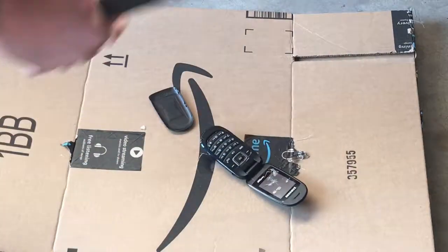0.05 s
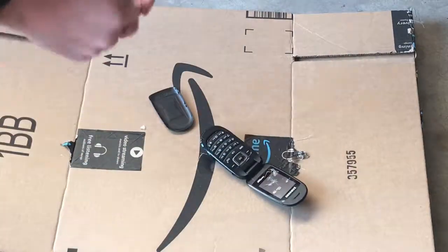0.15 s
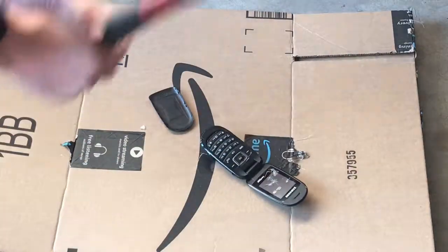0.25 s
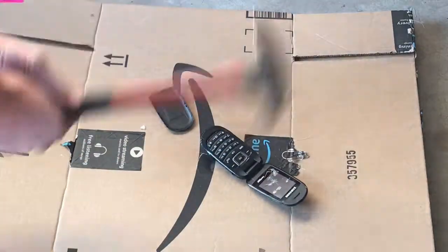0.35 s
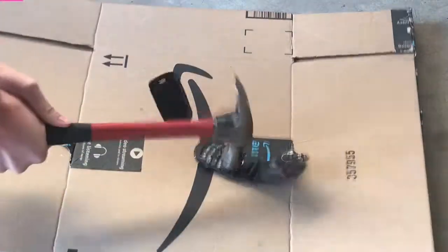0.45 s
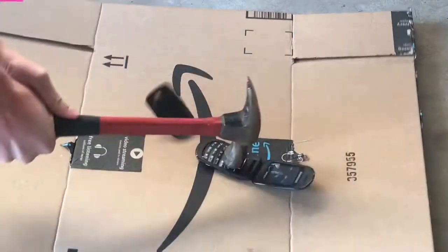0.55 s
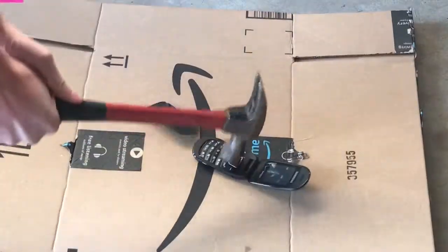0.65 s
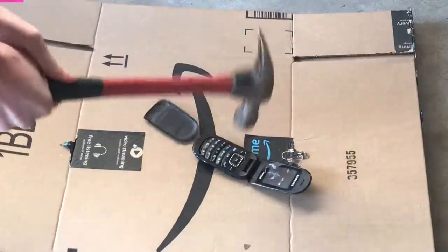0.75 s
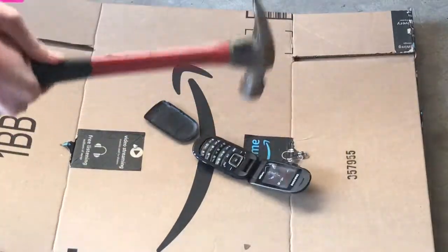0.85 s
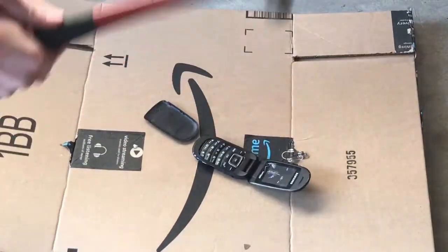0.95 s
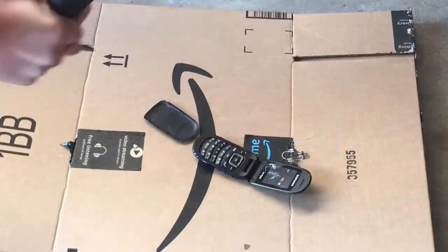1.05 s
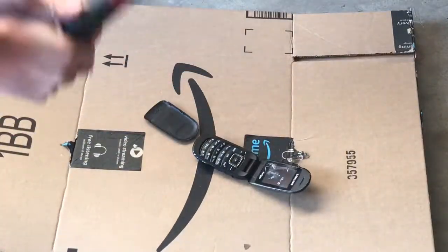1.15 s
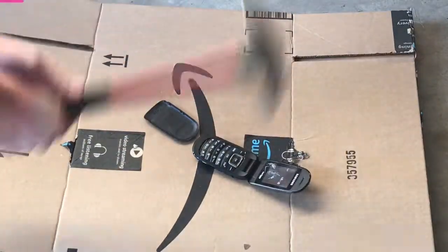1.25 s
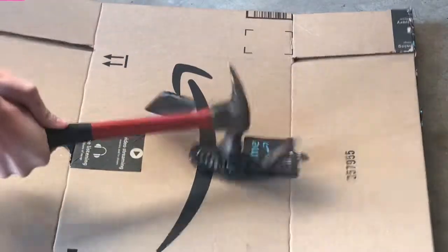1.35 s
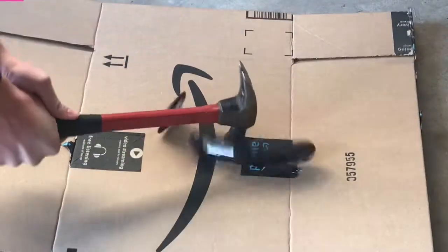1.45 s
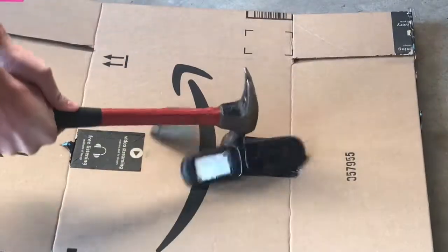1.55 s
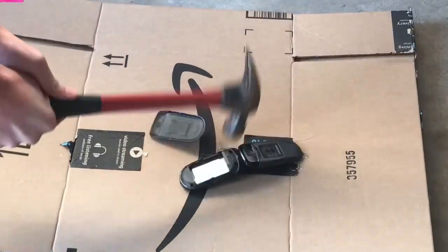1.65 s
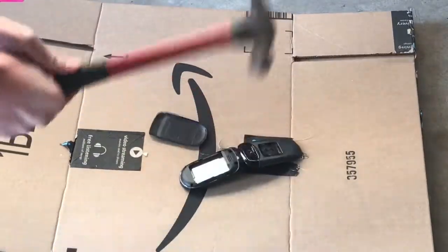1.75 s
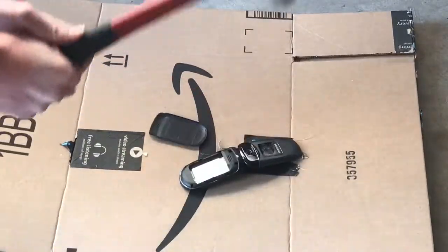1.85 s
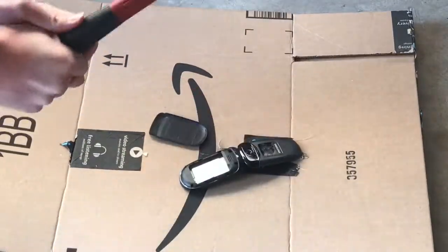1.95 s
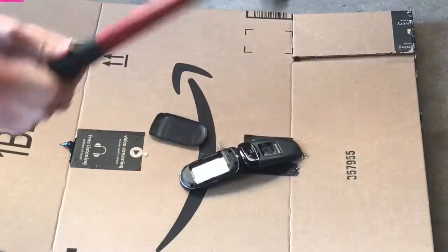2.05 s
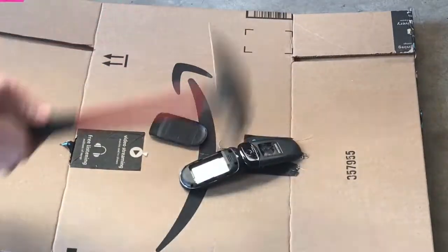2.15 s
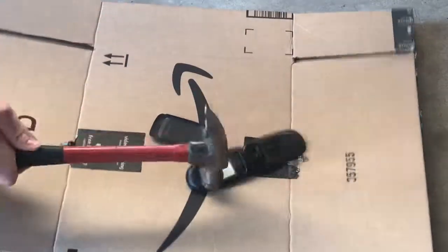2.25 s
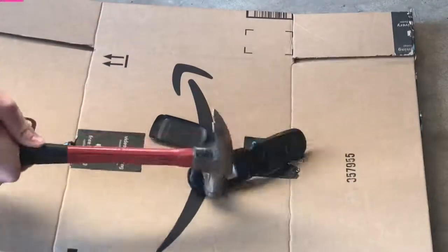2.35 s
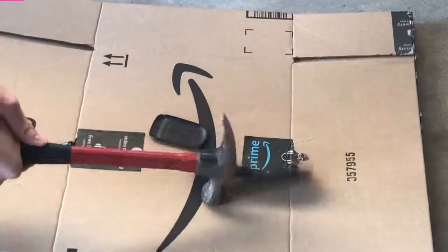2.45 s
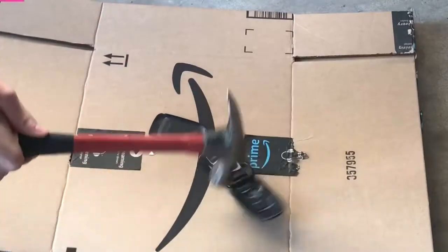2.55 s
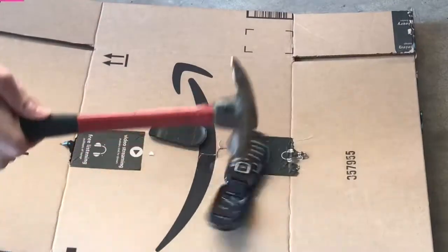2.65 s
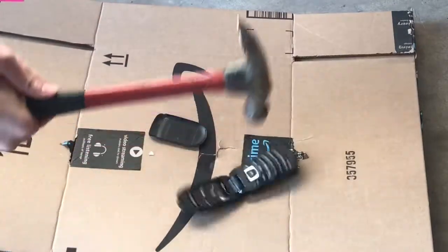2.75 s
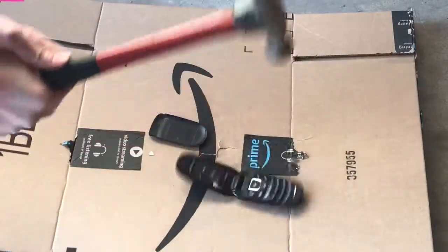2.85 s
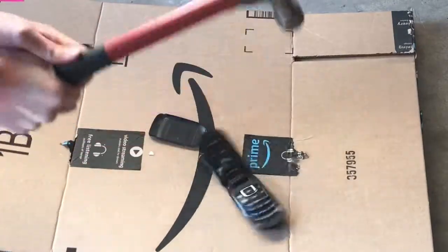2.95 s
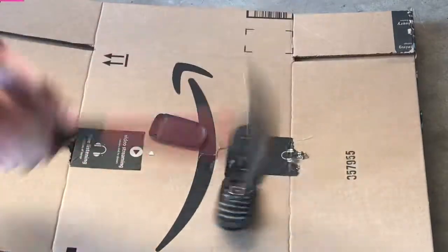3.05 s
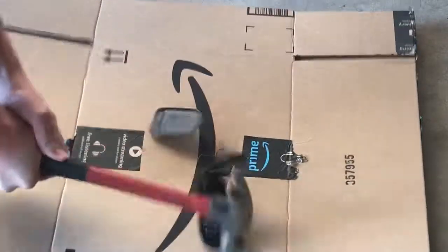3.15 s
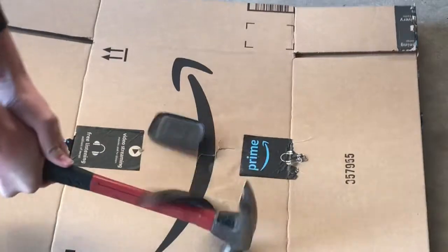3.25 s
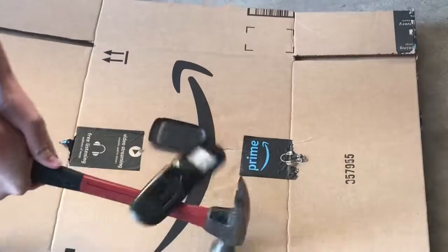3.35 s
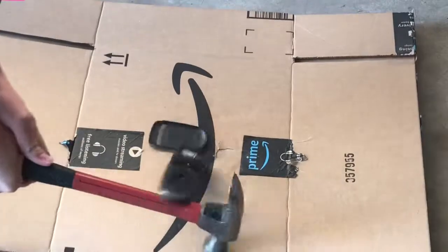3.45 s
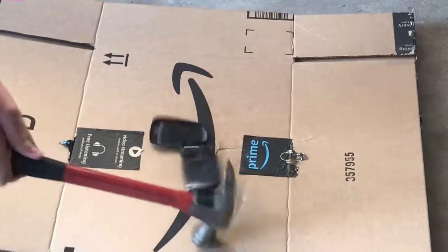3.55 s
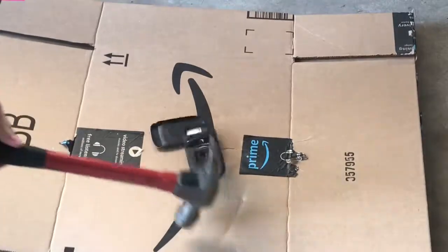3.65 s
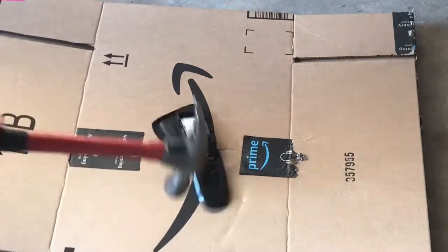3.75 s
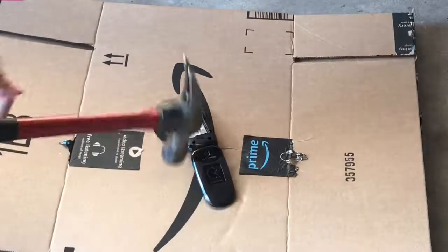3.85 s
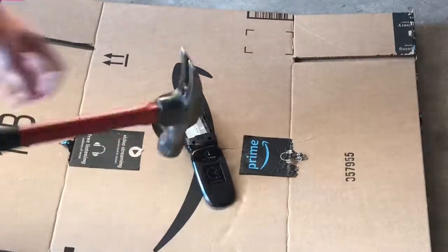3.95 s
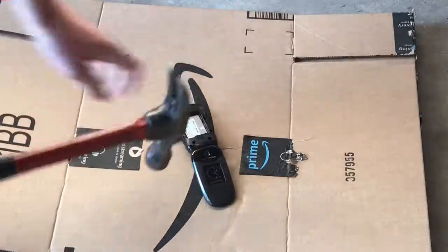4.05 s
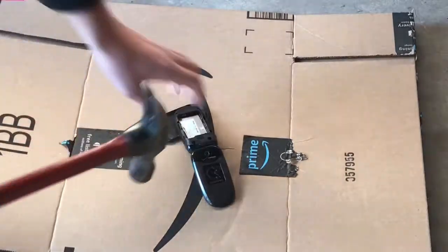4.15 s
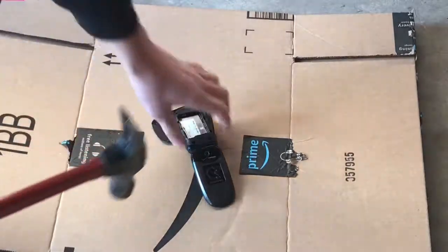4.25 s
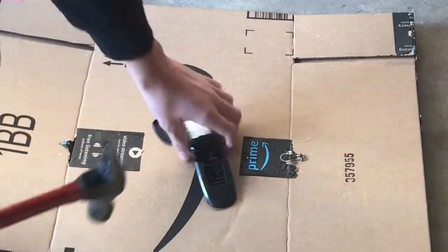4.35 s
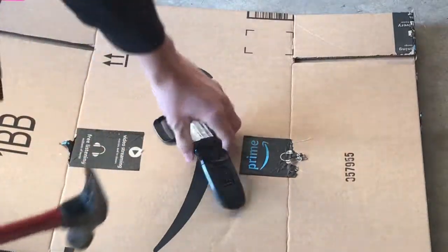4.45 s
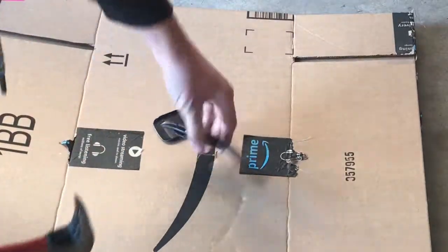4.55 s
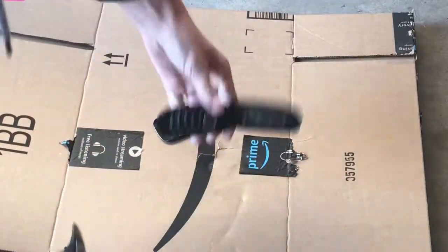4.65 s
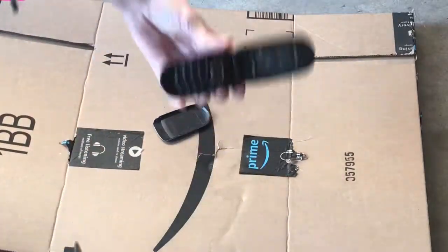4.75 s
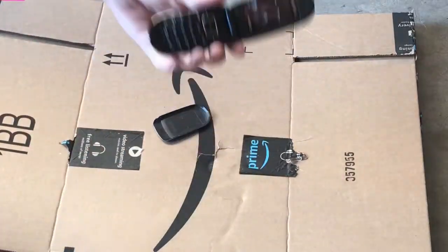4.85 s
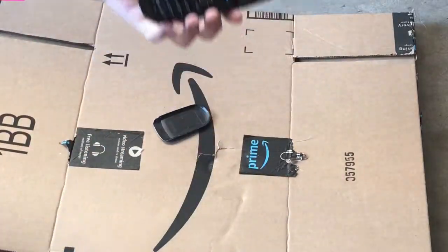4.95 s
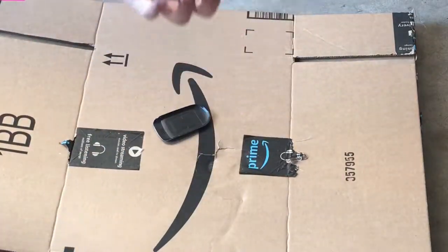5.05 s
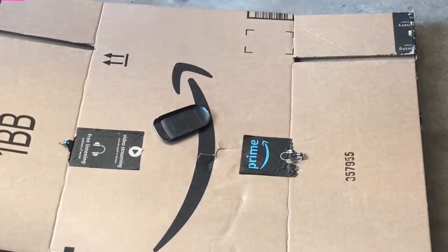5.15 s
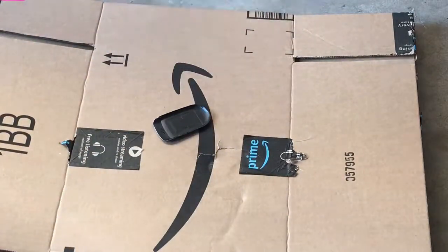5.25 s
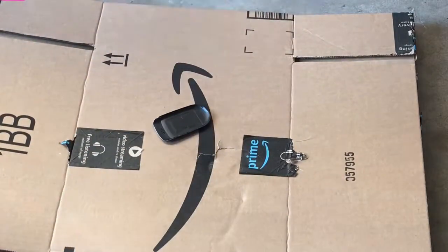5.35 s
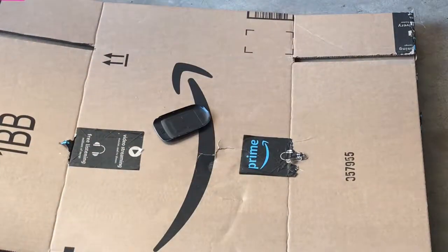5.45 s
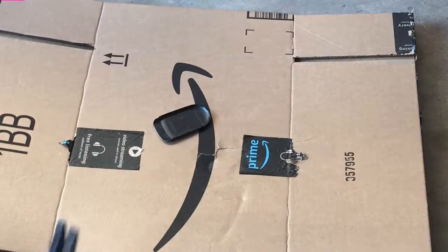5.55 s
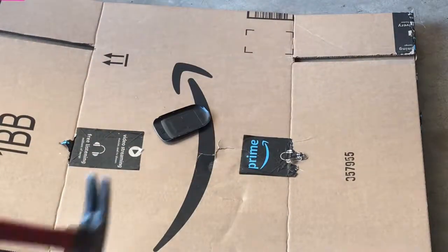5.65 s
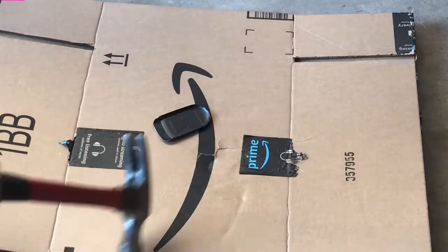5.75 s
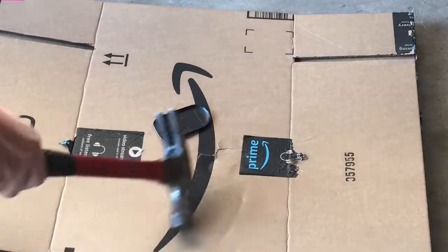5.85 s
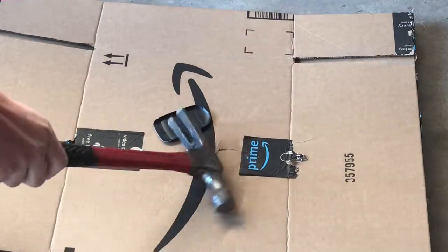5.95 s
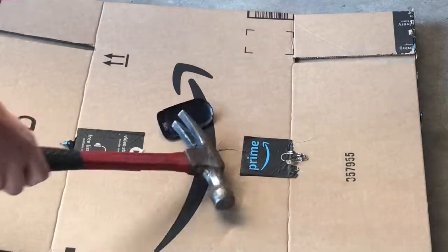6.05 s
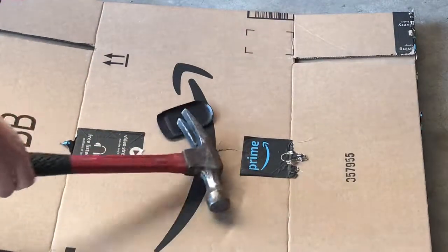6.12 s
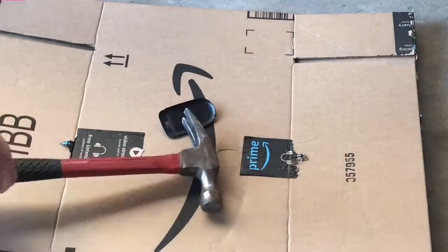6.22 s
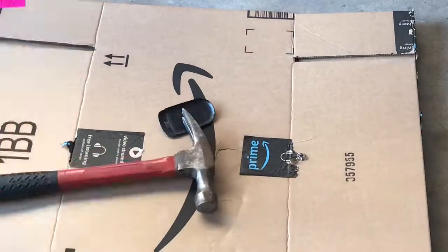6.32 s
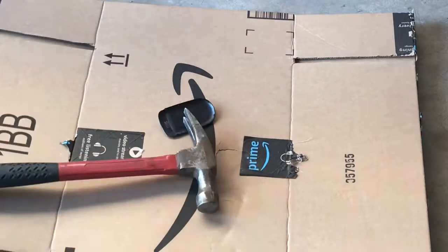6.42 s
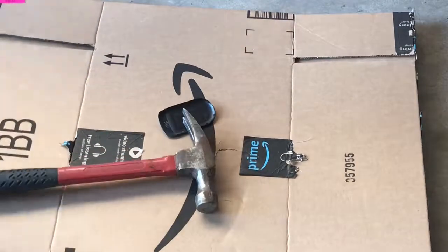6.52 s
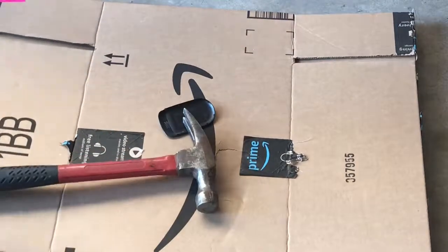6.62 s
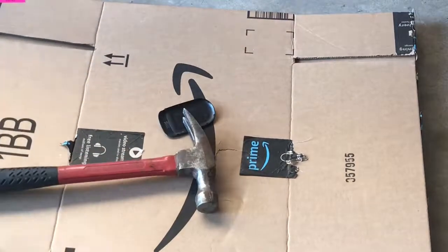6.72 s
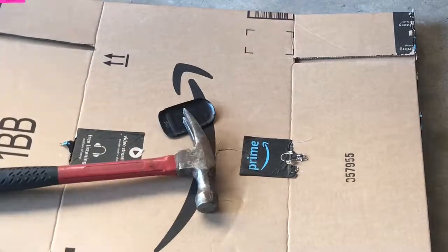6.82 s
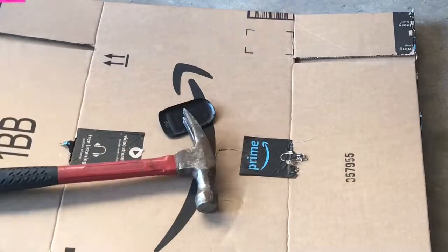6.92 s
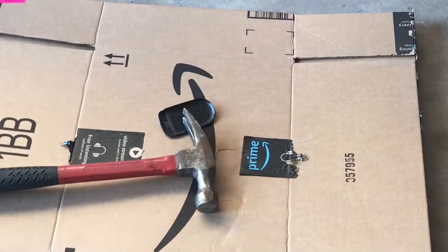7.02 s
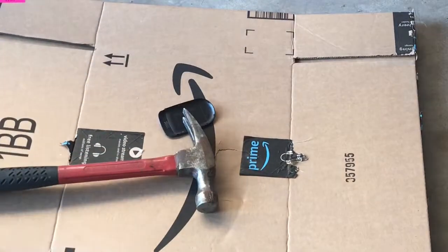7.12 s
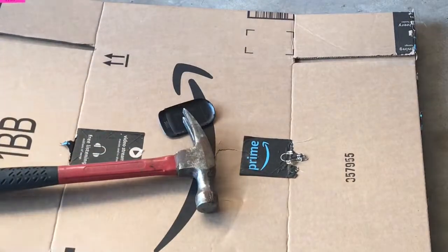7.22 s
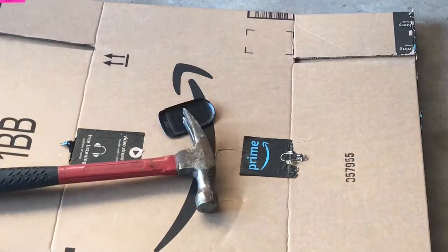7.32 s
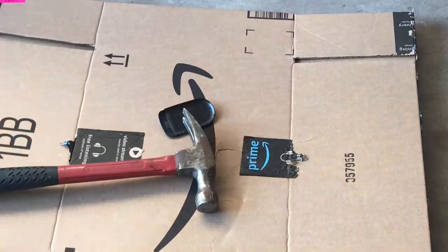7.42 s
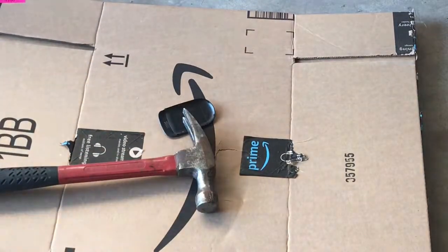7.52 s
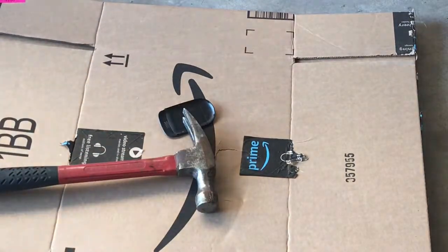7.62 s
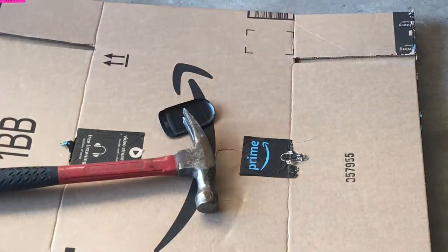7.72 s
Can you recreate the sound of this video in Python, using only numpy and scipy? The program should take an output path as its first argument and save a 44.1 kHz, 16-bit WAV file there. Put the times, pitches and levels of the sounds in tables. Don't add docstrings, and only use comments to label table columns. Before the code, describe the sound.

A hammer smashes brittle plastic four times with booming cardboard thumps, scattering fragments; then a sharp tap, and the hammer is laid down.

```python
import sys
import numpy as np
from scipy import signal
from scipy.fft import rfft, irfft, next_fast_len
from scipy.io import wavfile
from scipy.ndimage import uniform_filter1d

SR = 44100
rng = np.random.default_rng(int(sys.argv[2]) if len(sys.argv) > 2 else 0)


def pcm_store(signal):
    levels = np.round(np.clip(np.atleast_2d(signal), -1, 1) * 32767)
    wavfile.write(sys.argv[1], SR, levels.astype(np.int16).T)


def ratio(d):
    e = np.asarray(d, float) / 20
    return 10 ** e


N = 342963
TIME = np.arange(N) / SR


def unit(x):
    return x / np.sqrt(np.mean(x ** 2))


def curve(table, column):
    rows = np.array(table)
    return np.interp(TIME, rows[:, 0], rows[:, column])


def between_ends(table):
    return (TIME >= table[0][0]) & (TIME <= table[-1][0])


def walk(rate):
    hold = int(SR / rate)
    steps = np.repeat(rng.standard_normal(N // hold + 1), hold)
    return 1.3 * uniform_filter1d(uniform_filter1d(steps, hold), hold)[:N]


def ring(x, hz, width):
    return signal.lfilter(*signal.iirpeak(hz, hz / width, fs=SR), x)


def body(x, modes):
    rings = sum((-1) ** k * ratio(db) * ring(x, hz, width) for k, (hz, width, db) in enumerate(modes))
    top_hz = min(1.8 * modes[-1][0], .4 * SR)
    return signal.lfilter(*signal.butter(2, top_hz, fs=SR), rings)


def chime(at_s, modes, rise_s):
    out, start = np.zeros(N), int(at_s * SR)
    longest_s = max(mode[2] for mode in modes)
    t = TIME[:min(int(1.5 * SR * longest_s) + 500, N - start)]
    rings = sum(ratio(db) * np.sin(2 * np.pi * hz * t) * 1000. ** (-t / max(t60, .005))
                for hz, db, t60 in modes)
    out[start:start + len(t)] = (1 - np.exp(-t / rise_s)) * rings
    return out


def contact(s, db, draw, length_s, rise_s, hold, modes):
    t = TIME[:draw.shape[-1]]
    attack = 1 - np.exp(-(t + 1 / SR) / rise_s)
    decay = np.exp(-(t / max(length_s, 2e-4)) ** hold)
    cracks = body(draw[0] * ratio(3.8 * draw[1]) * attack * decay, modes)
    click = body(1. * (t == 0), modes)
    pair = np.array([cracks / np.linalg.norm(cracks), click / np.linalg.norm(click)])
    strength = ratio(db) * np.sqrt(SR / 100)
    lead_s = .0004
    return int((s - lead_s) * SR), strength * pair


# centre in Hz, width in Hz, level in dB.
BOARD_MODES = [(216, 120, -10), (340, 130, -2), (500, 175, -1.5), (637, 229, 0.5), (853, 210, 3),
               (1170, 464, -4)]
# centre in Hz, width in Hz, level in dB.
SHELL_MODES = [(1578, 410, 8.5), (2127, 630, 10), (2970, 820, 6.5), (4570, 1400, -2)]
# centre in Hz, width in Hz, level in dB.
EDGE_MODES = [(5130, 990, 10), (7500, 7300, 5.5), (9700, 2230, 9.5), (12400, 3100, -2)]


def knocks(table, hold, rise_s, stretch, trims_db):
    size = SR // 8
    out = np.zeros((2, N + size))
    draws = rng.standard_normal((len(table), 3, 2, size))
    for (s, *layer_db, length), draw in zip(table, draws):
        for k, modes in enumerate((BOARD_MODES, SHELL_MODES, EDGE_MODES)):
            db, length_s = layer_db[k] + trims_db[k], length * stretch[k]
            i, sound = contact(s, db, draw[k], length_s, rise_s[k], hold, modes)
            out[:, i:i + size] += sound
    return out[:, :N]


# start in seconds, board thump in dB, shell in dB, splinters in dB,
# crushing time in seconds.
BLOWS = [
    (0.4656, -13.5, -18.5, -21, 0.018),
    (1.3675, -13, -20, -21.5, 0.0092),
    (2.2585, -14.5, -17.5, -20, 0.012),
    (3.1471, -15, -16, -20, 0.017),
]


def hammer_blows():
    return knocks(BLOWS, 1.5, (.0025, .0005, .0003), (1.1, .9, .6), (.6, .4, .4))


# start in seconds, peak in dB, pitch in Hz, t60 in seconds.
THUMPS = [(0.468, -14.5, 400, 0.14), (0.469, -19, 808, 0.19), (1.37, -17.5, 540, 0.13),
          (1.37, -14.5, 450, 0.12), (1.37, -19, 661, 0.13), (2.263, -17, 310, 0.17), (2.263, -20, 700, .15),
          (3.15, -20.5, 229, 0.15), (3.148, -13.5, 830, .24), (3.148, -18, 2090, 0.14)]


def board_thumps():
    return sum(chime(s, [(hz, db - 2.5, t60)], .003) for s, db, hz, t60 in THUMPS)


# pitch in Hz, level in dB, t60 in seconds.
SLAB_MODES = [(159.1, -21.5, 0.42), (119, -21.5, 0.19), (79, -31, 0.27)]


def slab_booms():
    return sum(ratio(db - BLOWS[0][1]) * chime(s, SLAB_MODES, 0.0059) for s, db, *_ in BLOWS)


def landings(table, rattle_s, ring_db):
    rows = [(s, db + 0.7 - hard_db, db, db - 9.5 + hard_db, rattle_s) for s, db, hard_db, _ in table]
    rings = sum(chime(s, [(hz, db + ring_db, 0.033)], 0.00024) for s, db, _, hz in table)
    return knocks(rows, 0.79, (.0004, .0002, .0001), (.9, .95, .7), (.3, .3, .3)), rings


# start in seconds, shell in dB, hardness in dB,
# ring in Hz (near 0 when it lands dead).
PIECES = [(0.675, -33, 5, 1661.5), (0.777, -44.5, -2.5, 2041), (0.848, -49, -4, 1101),
          (1.668, -35.5, 1, 914.5), (1.729, -46.5, 2, 643.5), (1.781, -34.5, 1, 958.5),
          (2.322, -30.5, 7.5, 0), (2.471, -32.5, 8.5, 2), (2.478, -40.5, 0.5, 1247), (2.642, -50, 0, 0),
          (3.38, -36.5, 3.5, 0), (3.417, -41, 1.5, 651), (3.436, -41, -6, 643), (3.495, -44.5, 1, 0),
          (3.545, -38, -6, 1042), (3.56, -50, 5, 0), (3.693, -47, -1, -3), (3.718, -46.5, -4, 0),
          (3.737, -41.5, -3, 1000), (3.808, -27.5, 2.5, 1896), (3.822, -37, 3, 0), (4.43, -48, 1.5, 0),
          (6.348, -43.5, -2, 1131.5)]


def bouncing_pieces():
    return landings(PIECES, rattle_s=0.0041, ring_db=9)


# start in seconds, shell in dB, hardness in dB, ring in Hz.
LAYING = [
    (6.06, -37, 3.5, 1430),
    (6.077, -33.5, 0, 894),
    (6.219, -33, 2, 2240),
]


def laying_hammer():
    return landings(LAYING, rattle_s=0.01, ring_db=5)


# start in seconds, peak in dB, pitch in Hz, t60 in seconds.
TAPS = [(5.0701, -12.5, 1300, 0.0047), (5.0705, -27, 340, 0.024), (5.0699, -21, 2460, .005),
        (3.812, -30, 334, 0.055), (3.2, -33, 230, 0.049), (1.729, -33, 2000, .035),
        (6.1, -38, 1230, 0.0074), (3.5, -36.5, 1950, .012), (3.607, -42, 3700, .008),
        (3.2, -29, 2600, .012), (3.693, -37, 2750, 0.034), (3.693, -46, 3300, .02),
        (3.436, -27, 2320, 0.022), (6.221, -28, 3300, 0.033), (6.085, -29.5, 2700, .03),
        (6.992, -34, 4300, 0.011), (2.645, -36.5, 1800, 0.027), (3.2, -45, 2800, .02),
        (3.8, -41, 2300, .02)]


def hard_taps():
    return sum(chime(s, [(hz, db, t60)], 0.00024) for s, db, hz, t60 in TAPS)


# pitch in Hz, level in dB, t60 in seconds.
STEEL_MODES = [(4450, -38, .04), (4450, -57, .2), (5163, -53, .3), (5470, -64, .5), (5486, -56, .8),
               (7400, -62, .12), (9600, -66, .12)]
# start in seconds, level in dB.
STEEL_TAPS = [
    (5.070, 0),
    (6.085, -5),
]


def steel_head():
    return sum(ratio(db) * chime(s, STEEL_MODES, 0.00029) for s, db in STEEL_TAPS)


def ticks(table):
    size = SR // 20
    out = np.zeros((2, N + size))
    draws = rng.standard_normal((len(table), 2, size))
    for (s, db, hz, length), draw in zip(table, draws):
        modes = [(hz, hz / 0.82, 0), (11000, 8000, -9)]
        i, sound = contact(s, db + .3, draw, length, .0001, 0.69, modes)
        out[:, i:i + size] += sound
    return out[:, :N]


# start in seconds, level in dB, centre in Hz.
CHIPS = [(0.89, -65, 6000), (1.03, -67, 8950), (1.441, -43, 12000), (1.447, -48, 8000),
         (1.481, -38.5, 8970), (1.527, -49, 9000), (1.556, -43, 10000), (1.591, -58, 7000),
         (1.87, -61.9, 11200), (2.306, -35, 11000), (2.466, -55, 12000), (2.578, -53, 11000),
         (2.591, -52, 6060), (3.246, -35.5, 8900), (3.259, -41, 8500), (3.286, -43, 11000),
         (3.315, -39.5, 11000), (3.333, -44, 7000), (3.342, -52, 7000), (3.645, -53, 9000),
         (3.758, -54, 4940)]


def splinters():
    return ticks([(*row, .0022) for row in CHIPS])


# start in seconds, level in dB, centre in Hz,
# rattle time in seconds.
CREAKS = [(0.174, -57, 11870, .0025), (4.155, -58.5, 6000, .008), (4.366, -64.5, 12050, .0016),
          (5.914, -53, 4970, 0.002), (6.396, -51, 9000, .0022), (6.402, -52.5, 7000, 0.0016),
          (6.473, -60, 9000, .002), (6.494, -53, 7500, 0.0013), (6.599, -59, 5940, .002),
          (6.741, -59, 8000, .002), (6.826, -57, 8000, 0.0014), (6.992, -45, 5500, 0.0056),
          (5.0698, -52.5, 5950, .0008), (7.505, -46.5, 4500, .008), (7.329, -69, 8000, .0015),
          (7.155, -57, 6460, 0.011), (7.642, -60, 8000, .012)]


def creaks():
    return ticks(CREAKS)


# centre in Hz, width in Hz, level in dB.
CLOTH_MODES = [(2103, 1700, 5), (4700, 2300, -3)]


def rubbing_textures():
    grain = rng.standard_normal(N) * ratio(2.5 * walk(300) + 2.5 * walk(40))
    bright, dull = unit(body(grain, EDGE_MODES)), unit(body(grain, CLOTH_MODES))
    crumbs = (rng.random(N) < 150 / SR) * rng.standard_normal(N) * ratio(5.9 * rng.standard_normal(N))
    crumb_modes = [(hz, width / 3.0, db) for hz, width, db in SHELL_MODES]
    return grain, bright, dull + ratio(-2) * unit(body(crumbs, crumb_modes))


# start in seconds, held for seconds, level in dB, slowing in
# dB per second (negative when it grows), dull share in dB.
SLIDES = [(0.0, .17, -79, 1, -7), (.175, 0.081, -62, -20, -11.5), (.7, .28, -64, 28, 5.5),
          (1.5, 0.17, -60.5, -2, 6.5), (2.5, 0.35, -65, 20, 4), (3.3, 0.6, -58, 10, 6),
          (3.9, 0.29, -63.5, 32, -10), (4.2, 0.4, -79, -3, 6), (6.15, .65, -68.5, -6, 1),
          (6.85, 0.94, -75.5, 0.5, -4.5)]


def sliding(bright, dull):
    out = np.zeros(N)
    for s, length, db, slowing, dull_db in SLIDES:
        t = TIME - s
        fall_db = slowing * np.clip(t, 0, length) + 200.5 * np.maximum(t - length, 0)
        out += np.clip(t / .007, 0, 1) * ratio(db - fall_db) * (bright + ratio(dull_db) * dull)
    return out


# time in seconds, level in dB, dull share in dB.
SCRAPE = [(5.903, -54, -2), (5.93, -52, 1.5), (5.99, -54, -3), (6.05, -55, -1), (6.10, -47, -8),
          (6.14, -66, 0)]
# time in seconds, level in dB, dull share in dB.
PICKUP = [(4.26, -87, 3), (4.36, -74, 5), (4.43, -62, 5), (4.47, -64, 6), (4.52, -66.5, 3), (4.58, -81, 0)]


def handling(bright, dull):
    out = np.zeros(N)
    for rows in (SCRAPE, PICKUP):
        fade = uniform_filter1d(1. * between_ends(rows), 300)
        out += fade * ratio(curve(rows, 1)) * (bright + ratio(curve(rows, 2)) * dull)
    return out


# time in seconds, level in dB.
SWISH = [(.17, -84), (.235, -70), (.258, -49.5), (.3, -61.5), (.42, -79)]


def sleeve_swish(grain):
    airy = unit(ring(ring(grain, 5700.0, 3900.0), 5800.0, 4700.0))
    return between_ends(SWISH) * ratio(curve(SWISH, 1)) * airy


# delay in seconds, level in dB.
ECHOES = [(.009, -8), (0.017, -14.5), (0.027, -17.5), (.040, -14), (.065, -14.5)]
# band centre in Hz, level in dB, t60 in seconds.
WALLS = [(128.8, -30, 0.45), (250, -34, 0.46), (470, -34.5, 0.52), (1000, -36, 0.51), (2000, -37.5, 0.51),
         (4140, -33.5, 0.39), (8000, -33, 0.29), (14000, -36.5, 0.15)]


def garage(near, send):
    t = TIME[:int(.9 * SR)]
    noise = rng.standard_normal((len(WALLS), len(t)))
    tail = sum(ratio(db) * ring(ring(n, hz, hz), hz, hz) * 1000. ** (-t / t60)
               for n, (hz, db, t60) in zip(noise, WALLS))
    early = np.zeros(len(t))
    for s, db in ECHOES:
        early[int(s * SR)] = ratio(db)
    echoes = signal.fftconvolve(near, ring(early, 820.0, 3000.0))[:N]
    reverb = signal.fftconvolve(send, tail * (1 - np.exp(-t / 0.0009)))[:N]
    return near + echoes + reverb


def engine(passes, wander_hz):
    drift, swell = np.cumsum(wander_hz * walk(22)) / SR, 1.8 * walk(13)
    out = np.zeros(N)
    for s, length, hz, db in passes:
        near = np.clip(np.minimum(TIME - s, s + length - TIME) / .1 + .5, 0, 1)
        out += near * ratio(db + 2.5) * np.sin(2 * np.pi * (hz * TIME + drift))
    return out * ratio(swell)


# start in seconds, heard for seconds, pitch in Hz, level in dB.
LOW_NOTE = [(.05, .4, 75.3, -53.5), (1.55, .7, 89.6, -50.5), (2.6, .55, 88, -57), (3.9, 0.36, 86.5, -46),
            (4.35, .65, 87, -53.5), (5.25, 0.54, 85, -49.5), (6.0, .9, 82, -52.5), (7.3, .6, 76, -45.5)]
# start in seconds, heard for seconds, pitch in Hz, level in dB.
HIGH_NOTE = [(0.0, 0.14, 215, -52), (.62, 0.47, 200.5, -52.5), (2.8, 0.41, 190, -52),
             (3.47, 0.46, 196, -51.5), (5.45, .8, 214, -52), (6.3, 1.3, 182, -51.5)]
# start in seconds, heard for seconds, pitch in Hz, level in dB.
WHINE = [(5.12, .76, 562, -56.5)]


def passing_engines():
    return engine(LOW_NOTE, 2.3) + engine(HIGH_NOTE, 3.2) + engine(WHINE, 3.02)


# time in seconds, rumble in dB, tyre roar in dB.
STREET = [(0, -49.5, -48), (1.2, -48, -47), (2.2, -46.5, -47.5), (3, -46, -46), (4, -47, -47.5),
          (4.8, -49.5, -48), (5.6, -47.5, -47), (6.5, -46, -46), (7.2, -45, -45), (7.78, -46, -46)]
# frequency in Hz, level in dB per Hz.
STREET_COLOUR = [(24, -18), (56, -1.5), (220, -10.5), (450, -21), (700, -16.5), (1170, -16.5),
                 (4870, -51.5), (15500, -63)]


def street():
    hz, db = np.transpose(STREET_COLOUR)
    size = next_fast_len(N)
    f = np.maximum(np.fft.rfftfreq(size, 1 / SR), 1)
    shaped = rfft(rng.standard_normal(size)) * ratio(np.interp(np.log(f), np.log(hz), db))
    parts = [0, 0]
    for centre in 25 * 2 ** np.arange(0, 10, .5):
        slot = np.cos(np.pi * np.clip(np.log2(f / centre), -.5, .5)) ** 2
        parts[int(centre > 300)] += irfft(shaped * slot, size)[:N] * ratio(1.0 * walk(6))
    rumble, roar = unit(parts[0]), unit(parts[1])
    return ratio(curve(STREET, 1)) * rumble + ratio(curve(STREET, 2) - 2.0) * roar


def scene():
    pieces, clacks = bouncing_pieces()
    laying, clanks = laying_hammer()
    clacks = clacks + clanks + hard_taps()
    direct, send = hammer_blows() + pieces + laying + splinters() + creaks()
    near = garage(direct + clacks, send + ratio(-9.5) * clacks)
    near = near + board_thumps() + slab_booms() + steel_head()
    grain, bright, dull = rubbing_textures()
    near = near + sliding(bright, dull) + handling(bright, dull) + sleeve_swish(grain)
    return (near + street() + passing_engines())[None]


def top_cut(x):
    return signal.sosfilt(signal.butter(12, 16840, fs=SR, output="sos"), x)


def record(dry):
    port = dry - 0.37 * ring(dry, 10600., 920.0)
    lean = signal.sosfilt(signal.butter(3, 34, "high", fs=SR, output="sos"), port)
    soft = .62 * np.tanh(lean / .62)
    mix = signal.sosfilt(signal.ellip(8, .2, 40, 15700, fs=SR, output="sos"), soft)
    return top_cut(mix)


dry = scene()
out = record(dry)
pcm_store(out)
```